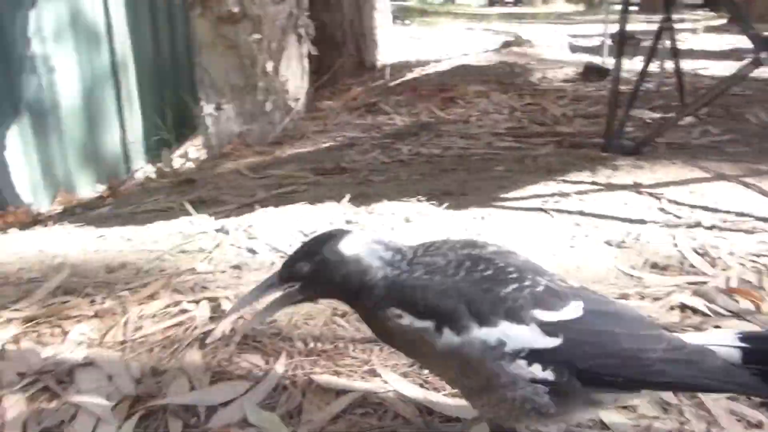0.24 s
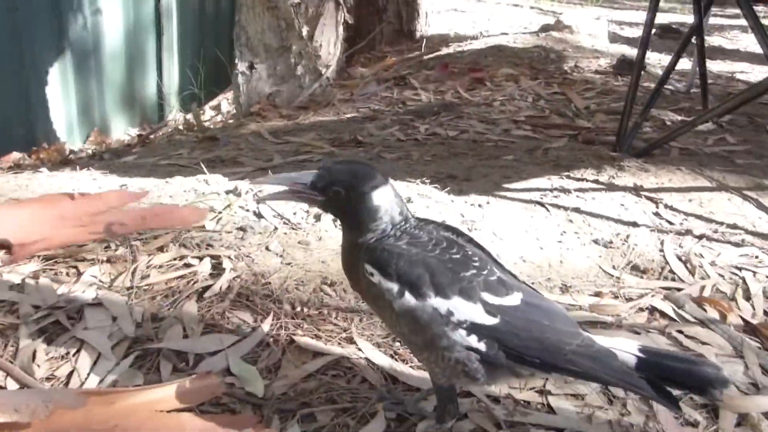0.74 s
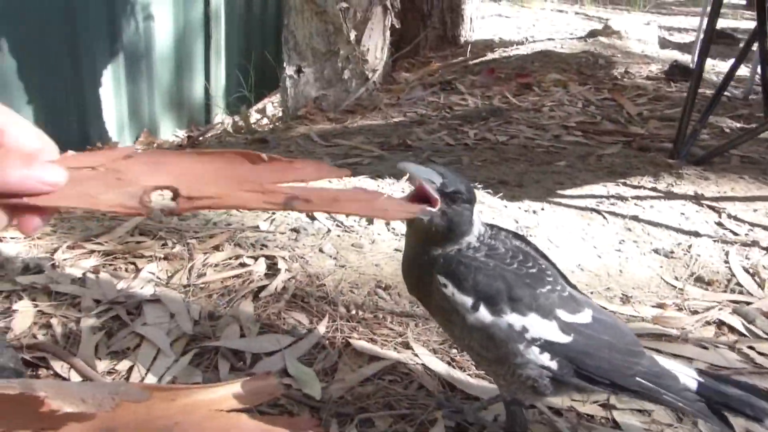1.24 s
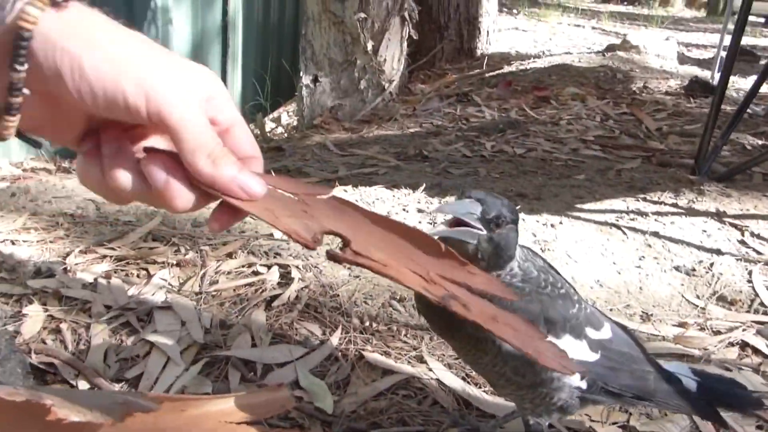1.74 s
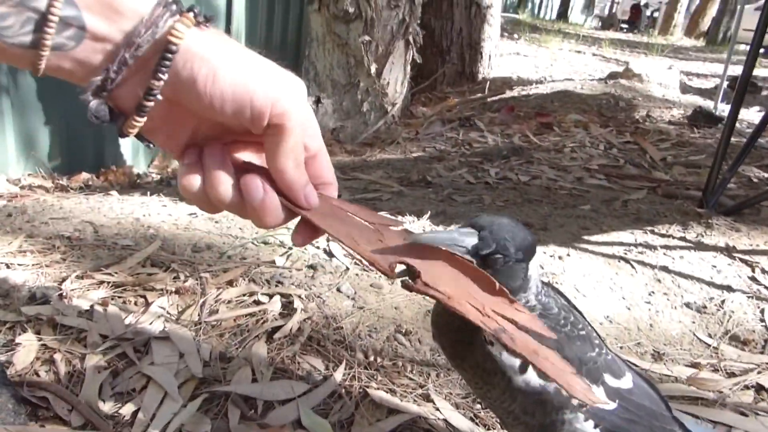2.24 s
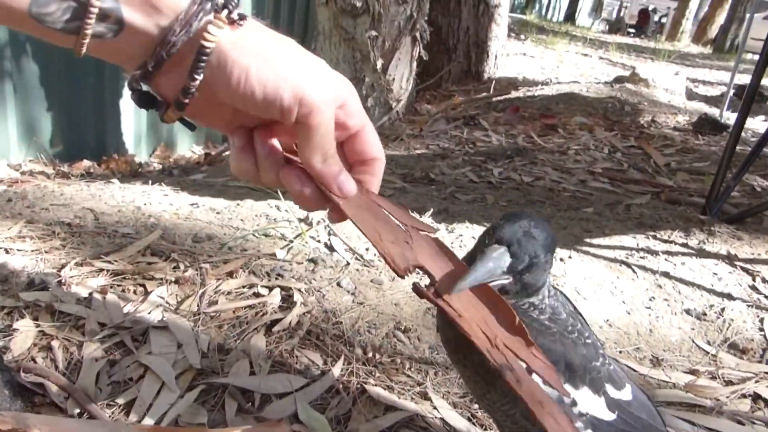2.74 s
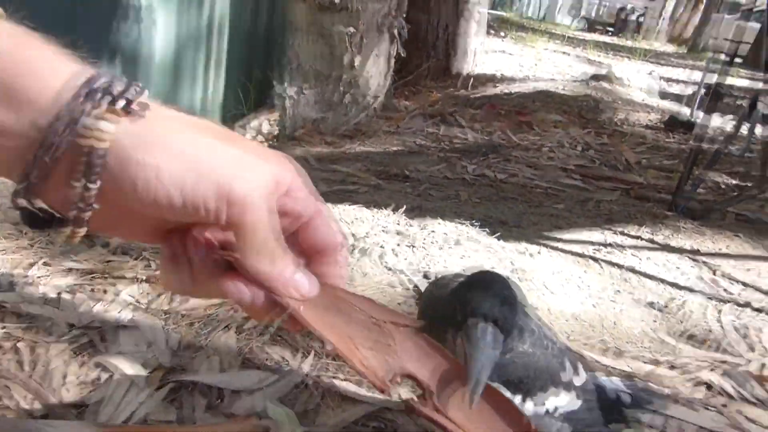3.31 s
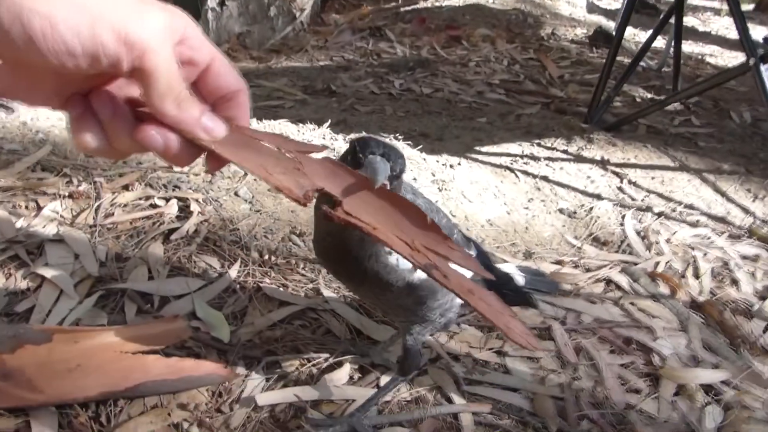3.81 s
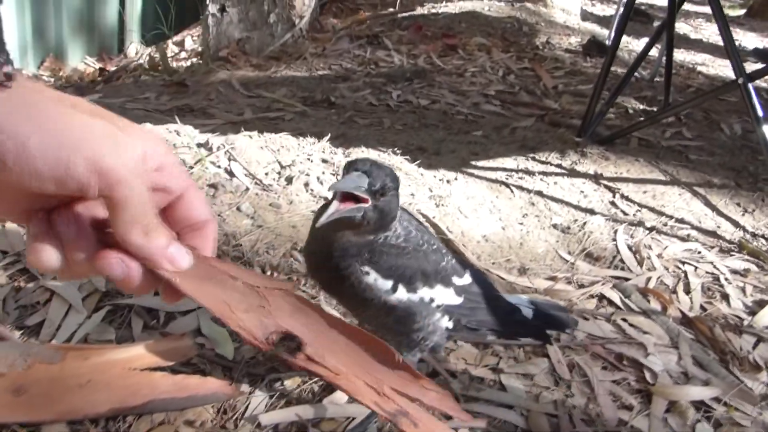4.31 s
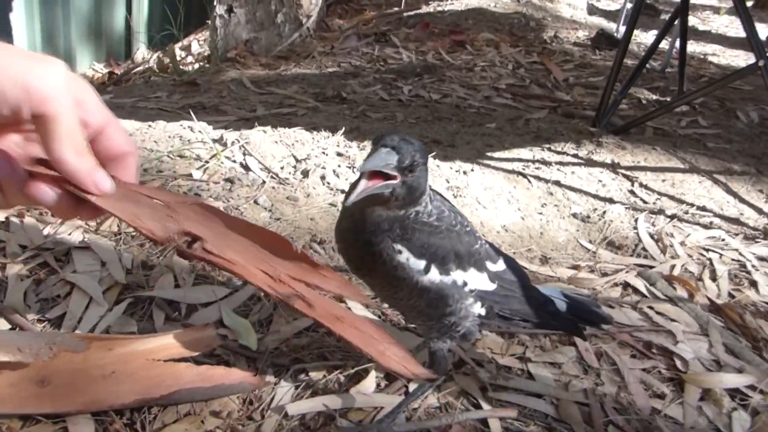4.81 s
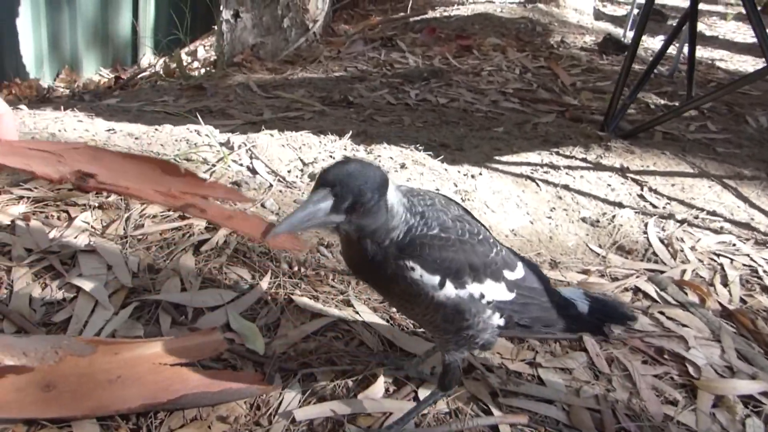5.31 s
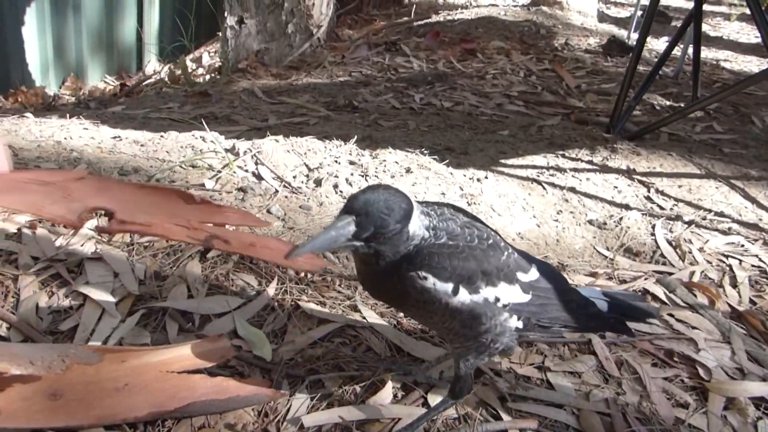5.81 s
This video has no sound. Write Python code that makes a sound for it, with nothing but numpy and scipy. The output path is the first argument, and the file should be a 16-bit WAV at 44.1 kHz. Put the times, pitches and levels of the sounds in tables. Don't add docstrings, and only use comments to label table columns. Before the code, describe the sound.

Dry, close outdoor sound with faint far-off hum and airy wash. Leaf rustle and twig snaps open, then a young magpie gives nasal, hoarse begging squawks, the first faint, the second long and loud, with clucks and crackle between. Beak knocks on bark lead into a rough, fibrous drag and rapid scuffs. Then come four arched calls, higher pitched and rising before they drop, among sparse clacks, leaf crackle and a final bead tick.

```python
import sys
import numpy as np
from scipy import signal
from scipy.io import wavfile
from scipy.ndimage import uniform_filter1d

SR = 44100
rng = np.random.default_rng(int(sys.argv[2]) if len(sys.argv) > 2 else 0)


def decibels_to_gain(level_db):
    exponent = np.asarray(level_db, float) / 20
    return 10 ** exponent


def int16_out(signal):
    q = np.round(np.clip(np.atleast_2d(signal).T, -1, 1) * 32767)
    wavfile.write(sys.argv[1], SR, q.astype(np.int16))


N = 266981

# start_scale, end_scale (of the resonances), low_growth_db_per_s
NECK = [
    (1.02, 0.99, -3),
    (1.032, 0.981, -0.2),
    (0.983, 1.01, 0.3),
    (.98, 1.017, 2),
    (1.007, 0.997, -5),
    (0.997, 1.01, 2.5),
    (1.002, 0.98, -6),
    (0.972, 1.022, 5),
]


def rms_one(x):
    return x / np.sqrt(np.mean(x ** 2) + 1e-20)


def in_time(rows):
    s, *columns = np.transpose(rows)
    return [np.interp(np.arange(N) / SR, s, column) for column in columns]


def sounding(tables, fade_s):
    t = np.arange(N) / SR
    return sum(np.clip(np.minimum(t - rows[0][0], rows[-1][0] - t) / fade_s + 1, 0, 1) for rows in tables).clip(0, 1)


def at_hz(points, hz):
    return np.interp(np.log(hz), np.log(np.array(points)[:, 0]), np.array(points)[:, 1])


def band(x, low_hz, high_hz, order=2):
    edges_hz = [low_hz, min(high_hz, SR / 2.2)]
    return signal.sosfilt(signal.butter(order, edges_hz, "band", fs=SR, output="sos"), x)


def drift(hz):
    r = np.exp(-2 * np.pi * hz / SR)
    noise = rng.standard_normal(N + 20000)
    return rms_one(signal.lfilter([1], [1, -2 * r, r * r], noise)[20000:])


def resonate(x, modes):
    out = 0
    for k, (hz, width, db) in enumerate(modes):
        r = np.exp(-np.pi * width / SR)
        poles = [1, -2 * r * np.cos(2 * np.pi * hz / SR), r * r]
        out = out + (-1) ** k * decibels_to_gain(db) * signal.lfilter([1 - r * r, 0, r * r - 1], poles, x)
    return out


def twice(x, modes):
    return rms_one(resonate(resonate(x, modes), modes))


def evened(x):
    return x / np.sqrt(uniform_filter1d(x ** 2, size=1500) + 1e-12)


def grains(per_s, spread_db, channels=2):
    sizes = decibels_to_gain(spread_db * np.minimum(rng.exponential(1, (channels, N)), 5))
    sizes = sizes * rng.choice([-1, 1], (channels, N))
    return sizes * (rng.random((channels, N)) < per_s / SR) + 1e-18


def paired(x, alike):
    alike = np.clip(alike, 0, 1)
    return (np.sqrt(1 + alike) * x[0] + np.sqrt(1 - alike) * x[1] * [[1], [-1]]) / np.sqrt(2)


def coloured(source, spectrum, patchy_db):
    # pitch_hz, likeness (0-1)
    likeness = [(100, 1), (240, 0.7), (950, 0.029), (3770, 0.71), (15000, 0.092)]
    out, edges_hz = 0, 42 * 2 ** np.arange(0, 9.1, .5)
    flicker = decibels_to_gain(patchy_db * drift(10.4))
    for k, (low, high) in enumerate(zip(edges_hz, edges_hz[1:])):
        hz = np.sqrt(low * high)
        gain = decibels_to_gain(at_hz(spectrum, hz)) * np.roll(flicker, 13000 * k)
        out = out + gain * paired(band(source[k % 2], low, high), at_hz(likeness, hz))
    return rms_one(out)


def open_air():
    # pitch_hz, density_db (per Hz)
    air_colour = [(18, -59), (30, 7), (53, -40), (90, 0), (161, -8), (193, -4.5), (264, -8), (301, -6),
                  (537, -15.5), (581, -6.5), (735, -7), (2100, -24), (7580, -29), (11000, -35),
                  (15800, -59)]
    # pitch_hz, width_hz, level_db
    hum = [(94, 3.5, -84), (186, 4.2, -57.5)]
    out = decibels_to_gain(-47.5) * coloured(rng.standard_normal((2, 2, N)), air_colour, patchy_db=2.5)
    noise = rng.standard_normal(N)
    for hz, width, db in hum:
        out = out + decibels_to_gain(db) * twice(noise, [(hz, width, 0)])
    return out


def leaves():
    # peak_s, peak_db, rise_db_per_s, fall_db_per_s
    shuffles = [(.08, -37, 4, 20), (.3, -44, 14, 75), (.845, -42.5, 700, 94), (1.05, -33.5, 130, 120),
                (1.66, -49.5, 200, 102), (1.93, -54, 54, 99), (2.78, -28.5, 194, 114),
                (3.87, -37.5, 115, 80), (4.02, -40, 56, 80), (4.3, -49, 1, 150), (4.75, -51, 56, 98),
                (5.26, -58.5, 60, 34), (5.96, -63, 60, 86)]
    # pitch_hz, density_db (per Hz)
    leaf_colour = [(530, -9), (900, 10), (1470, -7.5), (1820, 14), (2510, -9.5), (5310, 7), (6050, 0),
                   (10100, 4), (12500, -18), (15500, -35)]
    t = np.arange(N) / SR
    power = sum(decibels_to_gain(db - np.maximum(rise * (s - t), fall * (t - s))) ** 2 for s, db, rise, fall in shuffles)
    crackle = np.array([grains(7000 * decibels_to_gain(2.6 * drift(27)), 2.2) for k in range(2)])
    pan = decibels_to_gain(-4.5 + np.array([[1.5], [-1.5]]))
    return np.sqrt(power) * pan * coloured(crackle, leaf_colour, patchy_db=2.6)


def ticks():
    # start_s, peak_db, pitch_hz, left_right_db
    twig_snaps = [(.191, -24.5, 4030, 9), (0.224, -24, 5300, 11), (.277, -32, 5500, 9),
                  (0.295, -34, 5600, 6), (.086, -34.5, 6900, 6), (.5285, -32, 1540, 15),
                  (.598, -38, 6000, 8), (.68, -56, 8850, 2), (.762, -36, 1600, 1), (0.809, -36, 1825, 14),
                  (.833, -26, 5570, 5), (0.854, -27.5, 1950, 5), (0.891, -31, 1830, 3.5),
                  (0.89, -35, 8050, 3.5), (.9477, -29, 1660, 3), (0.973, -38, 3250, 4),
                  (.9951, -32, 3427, 2), (1.014, -37, 4030, 2.5), (4.749, -42, 4900, 10),
                  (4.774, -36, 1550, 3.5), (4.9233, -43, 4520, 11)]
    # start_s, peak_db, pitch_hz
    beak_clacks = [(2.609, -20.5, 1572), (2.705, -14, 1676), (2.718, -29, 4640), (2.738, -25, 1500),
                   (2.945, -23, 4000), (2.955, -31, 10500), (3.1638, -30, 3980), (3.3948, -26, 6860),
                   (3.8745, -25, 2040), (3.958, -25, 4670), (3.971, -23, 4800), (4.0211, -16, 4700),
                   (4.637, -25, 4600), (5.0209, -23, 4190)]
    # start_s, peak_db, pitch_hz
    high_pings = [(1.6878, -39, 8240), (1.735, -31, 8100), (1.7534, -45, 8250), (1.801, -37, 8250),
                  (1.869, -33, 8280), (2.717, -36, 8750), (2.845, -24, 9800), (2.869, -27, 9500),
                  (2.883, -40, 10900), (2.898, -34, 8200), (3.316, -26, 8250), (3.335, -44, 8250),
                  (3.3729, -23.5, 8160), (3.99, -33, 8800), (4.01, -33, 8800), (4.035, -34, 9000),
                  (6.0444, -21, 8100)]
    rows = [(*r, -5, 0.0011, 0.01, 9200) for r in twig_snaps]
    rows += [(*r, -1, 1.9, 0.00035, 0.0079, 6300) for r in beak_clacks]
    rows += [(*r, 3, -26, -0.3, -1.5, 11000) for r in high_pings]
    out, length = np.zeros((2, N)), 1300
    t = np.arange(length) / SR
    noises = rng.standard_normal((len(rows), 2, length))
    for (s, peak_db, hz, pan_db, snap_db, rise_s, ring_s, top_hz), noise in zip(rows, noises):
        burst = paired(noise, 0.89)
        decay = np.exp(-t / 0.00093) + 0.079 * np.exp(-t / 0.018)
        snap = band(burst * decay, 0.29 * hz, top_hz) * (1 - np.exp(-t / rise_s * 4))
        swell = (1 - np.exp(-t / rise_s)) * np.exp(-t / ring_s)
        ring = np.sqrt(hz / 5000) * resonate(burst * swell, [(hz, 700, -6)])
        tick = decibels_to_gain(snap_db) * snap + ring
        level = decibels_to_gain(peak_db + pan_db * np.array([[.5], [-.5]]))
        at = round(s * SR)
        out[:, at:at + length] += tick[:, :N - at] / np.abs(tick).max() * level
    return out


def squeak():
    # middle_s, pitch_hz, half_length_s, rise_per_s, level_db
    whistle = (2.684, 12300, 0.013, 1.4, -50)
    s, hz, half_s, rise, db = whistle
    t = np.arange(N) / SR - s
    return decibels_to_gain(db) * np.exp(-(t / half_s) ** 4) * np.sin(2 * np.pi * hz * t * (1 + rise * t / 2))


def bark_drag():
    # time_s, pressure_db, speed_db
    motion = [
        (2.76, -61, -53),
        (2.834, -47.5, -18.5),
        (2.962, -33.5, -23),
        (3.01, -42, -19.5),
        (3.136, -39, -36),
        (3.22, -44.5, -35.5),
        (3.334, -46.5, -28.5),
        (3.395, -39.5, -19.5),
        (3.45, -59, -51),
    ]
    # pitch_hz, width_hz, level_db
    strip_modes = [(187, 28.5, -4.5), (445, 121, 1.5), (537, 330, -0.5), (761, 86, 7.5)]
    # pitch_hz, width_hz, level_db
    grain_modes = [(3850, 760, 0)]
    # pitch_hz, width_hz, level_db
    fibre_modes = [(6770, 637, 14.5), (8450, 650, 15)]
    # pitch_hz, width_hz, level_db
    fine_modes = [(10600, 1200, -0.5)]
    body_db, coarse_db = in_time(motion)
    fine_db = -25 + 0.54 * coarse_db
    catches = paired(grains(2200 * decibels_to_gain(3.6 * drift(40)), 2.7), 1.0)
    body = rms_one(resonate(catches, strip_modes)) * decibels_to_gain([[2.0], [-2.0]])
    slips = paired(grains(8000 * decibels_to_gain(2.6 * drift(65)), 4.3), 0.92)
    drag = decibels_to_gain(body_db + 6) * body
    drag += decibels_to_gain(0.33 * body_db - 32.0) * twice(slips, grain_modes)
    drag += decibels_to_gain(coarse_db - 18.0) * twice(slips, fibre_modes)
    drag += decibels_to_gain(fine_db - 4.0) * twice(paired(grains(2500, 4.0), 0.56), fine_modes)
    return sounding([motion], 0.022) * drag


def bark_strokes():
    # start_s, peak_s, end_s, level_db, pitch_scale
    sweeps = [
        (3.415, 3.446, 3.484, -33, 0.99),
        (3.495, 3.506, 3.528, -39, .9),
        (3.519, 3.545, 3.568, -34.5, 1.04),
        (3.568, 3.614, 3.63, -36, 1.01),
        (3.684, 3.719, 3.752, -33.5, 0.973),
        (3.98, 4.01, 4.045, -40, 0.79),
    ]
    # pitch_hz, width_hz, level_db
    stroke_modes = [(420, 65, -3.5), (1213, 119, 5.5), (3060, 1200, -2.5), (6820, 650, 6.5),
                    (8050, 1700, -2), (11270, 4700, -13.5)]
    bite_s, shoulder = 0.011, 0.7
    t, out = np.arange(N) / SR, 0
    scuffs = paired(grains(9000 * decibels_to_gain(2.5 * drift(80)), 2.8), 0.94)
    for s, peak, end, db, scale in sweeps:
        bitten = s + bite_s
        swell = np.interp(t, [s, bitten, max(peak, bitten), end], [0, shoulder, 1, 0])
        out = out + decibels_to_gain(db + 7.5) * swell * rms_one(resonate(scuffs, np.multiply(stroke_modes, [scale, 1, 1])))
    return out


def clucks():
    # middle_s, pitch_hz, level_db, hoarseness (0-1)
    short_tones = [(0.072, 1770, -43.5, 0.3), (.088, 876, -37.5, 0.5), (.115, 577, -39.5, 0.26),
                   (.78, 876, -43, 0.43), (0.93, 600, -50, .3), (.965, 587, -42, 0.4),
                   (0.951, 1630, -55, .4), (.98, 1600, -50, 0.3), (0.989, 3280, -40, 1),
                   (1.015, 3340, -40.5, 1), (1.02, 4370, -37, 0.8), (1.075, 1625, -35.5, 1.1),
                   (1.112, 1710, -31, 1.1), (1.145, 1591, -36, 0.8), (3.915, 1067, -41, 1),
                   (3.95, 1220, -36.5, 0.6), (4.003, 1300, -38, 1.06)]
    now, flutter, out = np.arange(N) / SR, drift(210), 0
    for s, hz, db, hoarse in short_tones:
        t = now - s
        tone = np.sin(2 * np.pi * hz * t * (1 - 0.33 * t))
        out = out + decibels_to_gain(db) * np.exp(-(t / 0.022) ** 2) * (1 - hoarse + hoarse * flutter) * tone
    return out


def squawks():
    # time_s, pitch_hz, effort_db, gape_db (treble over fundamental)
    level_calls = [
        [(.401, 674, -41.5, 3), (.415, 732, -51.5, 19), (.499, 746, -47, -2.5), (.663, 805, -41, -6.5),
         (.683, 780, -43.5, -4)],
        [(1.052, 629, -32, 2), (1.106, 652, -32, -3.5), (1.206, 711, -35.5, 13.5), (1.32, 701.5, -29.5, 11),
         (1.375, 683, -32, 11), (1.46, 714, -28.5, 7.5), (1.53, 746.3, -27, 7), (1.612, 749.4, -28, 5),
         (1.644, 694, -35, 3)],
        [(1.948, 662.6, -44, 1), (1.994, 719, -41.5, 2), (2.1, 780, -38.5, -0.5), (2.298, 710, -33.5, 6.5),
         (2.378, 708.7, -27.5, 12.5), (2.51, 699.4, -30, 11.5), (2.56, 695.4, -38, 8)],
        [(2.757, 658, -38.5, 3.5), (2.86, 701, -37, 5), (2.934, 759, -40.5, 5), (3.024, 766.6, -38, -0.5),
         (3.114, 792.6, -51, 14), (3.135, 772, -42, -6)],
    ]
    # time_s, pitch_hz, effort_db, gape_db (treble over fundamental)
    arched_calls = [
        [(3.428, 778, -43.5, -15), (3.496, 814.6, -36, -4), (3.54, 853, -34, 0), (3.668, 915.5, -36, -9.5),
         (3.7, 937, -35.5, -8.5), (3.76, 938, -36, -11.5), (3.8, 939, -29, -2), (3.852, 916, -34, -6.5)],
        [(4.354, 746, -37, 1), (4.501, 918, -35.5, -1), (4.599, 929, -35, -0.5), (4.64, 921, -39, -4),
         (4.665, 912, -39, -9)],
        [(4.973, 736.6, -34.5, 4.5), (5.0, 756, -36.5, 3.5), (5.03, 810, -36.5, 1), (5.05, 877, -34.5, 1.5),
         (5.107, 897, -33, 2), (5.135, 961, -33.5, -0.5), (5.195, 978, -33.5, 1.5), (5.239, 943, -40.5, -8)],
        [(5.412, 709, -36, 6), (5.47, 703.6, -33.5, 5.5), (5.55, 810, -34, 0), (5.64, 875.4, -30.5, -1),
         (5.72, 861.5, -30, 2), (5.774, 908, -30.5, -1), (5.895, 876, -31.5, 1.5), (5.92, 835, -44, 2),
         (5.943, 640, -48.5, -1)],
    ]
    # onset_softness_db, release_s, low_overtones_db, strong_weak_alternation_rad, left_right_db
    manner = [
        (14, .047, 1.5, 0.0082, -2.5),
        (12, .026, -2.5, 0.22, -0.5),
        (3, .03, 0, 0.1, -1.5),
        (15, .012, 1.5, 0.019, -2.5),
        (-8, .048, -1, 0.0552, -1),
        (1, 0.032, -3, 0.16, 0.5),
        (3.5, 0.019, -7, 0.1, -1),
        (0.5, 0.026, -0.5, 0.2, 0.4),
    ]
    attack_s, scoop_hz, late_fundamental_db = .016, 29.97, 6.5
    sag_hz_per_s, release_db, closing_db = 2200, 25.5, 13
    follows_gape, low_bark_db, low_bark_s = 0.35, 2.5, 0.041
    out = []
    for rows, (soft_db, release_s, low_db, alternation, pan_db), (*_, grow_db) in zip(
            level_calls + arched_calls, manner, NECK):
        (s, hz, db, gape), end = rows[0], rows[-1]
        onset = (s - attack_s, hz - scoop_hz, db - (late_fundamental_db + soft_db) / 2,
                 gape + late_fundamental_db - soft_db)
        release = np.add(end, [release_s, -sag_hz_per_s * release_s, -release_db, -closing_db])
        call = []
        for s, hz, db, gape in [onset, *rows, release]:
            low = db + low_db + grow_db * (s - end[0]) + follows_gape * gape
            low += low_bark_db * np.exp((onset[0] - s) / low_bark_s)
            call.append((s, hz, db - gape / 2, low, db + gape / 2, alternation, pan_db))
        out.append(call)
    return out


def rasp():
    # from_s, turbulent_share (0-1)
    membrane_states = [(0, .85), (.44, .12), (.62, .3), (.9, .87), (1.162, .25), (1.37, .35), (1.49, .008),
                       (1.615, .4), (1.8, .86), (2.13, .7), (2.23, .4), (2.345, .004), (2.535, .4),
                       (2.65, .45), (2.875, 1), (3.3, .75), (3.52, .58), (3.62, .27), (3.69, .42),
                       (3.76, .33), (4.1, .56), (4.43, .38), (4.582, .07), (4.8, .56), (5.12, .44),
                       (5.3, .48), (5.49, .42), (5.83, .5), (5.92, .25)]
    s, share = np.transpose(membrane_states)
    share = share[np.searchsorted(s, np.arange(N) / SR, side="right") - 1]
    share = uniform_filter1d(share, size=1300)
    return share, .011 + .62 * np.abs(share) ** 1.75


def clean_cycles(shaken, pitch):
    waver, pulses = decibels_to_gain(2.84 * drift(11.3)), 0
    for k in range(1, 22):
        overtone = np.cos(k * shaken + 0.352 * k * k) / k ** 0.14
        pulses = pulses + overtone * (k * pitch < SR / 2.6) * np.roll(waver, 9000 * k)
    return rms_one(pulses)


def chaotic_cycles(phase, shaken, turbulent, air):
    flicker, strands = drift(40), 0
    half_shaken = phase + 0.62 * (shaken - phase)
    for k in range(3, 24):
        strands = strands + np.roll(flicker, 6000 * k) * np.cos(k * half_shaken / 2 + k * k)
    sizes = decibels_to_gain((3 + 6 * turbulent) * rng.uniform(-1.7, 1.7, N)) - 0.7
    cycle_ends = np.diff(np.maximum.accumulate(shaken // (2 * np.pi)), prepend=0) > 0
    slaps = evened(-sizes * cycle_ends + 1e-6 * air)
    slaps = rms_one(signal.lfilter([1, -0.2], [1], slaps))
    chaos = .3 * air + .62 * rms_one(strands) + .85 * slaps
    return chaos * turbulent + band(chaos, 1500, 22000, order=1) * (1 - turbulent)


def windpipe(source, calls, air):
    # pitch_hz, width_hz, level_db
    level_modes = [
        [(1315, 110, 20), (2230, 750, 11.5), (4600, 730, 16), (8500, 690, 1)],
        [(1280, 186, 9.5), (2250, 360, 7.5), (3240, 164, 1.5), (4093, 150, 13), (5560, 660, 3.5),
         (6350, 99, 9.5), (7760, 1100, -4.5), (9877, 580, 1)],
        [(1300, 171, 6.5), (2130, 232, 2), (3004, 190, -0.5), (4040, 255, 7), (4670, 520, 5.5),
         (5600, 230, 10.5), (6320, 99, 5.5), (7050, 146, 6.5), (7710, 91, 4), (8320, 230, 4.5),
         (10100, 310, -5), (12100, 2000, -4.5)],
        [(1300, 124, -3), (2080, 352, -7.5), (4190, 290, 5.5), (5420, 480, 11.5), (6860, 1000, -0.5),
         (10600, 2300, -2)],
    ]
    # pitch_hz, width_hz, level_db
    arched_modes = [
        [(1800, 584, 9), (3520, 240, 7.5), (5570, 340, 2), (6730, 280, 5.5), (8250, 2700, -7.5)],
        [(1700, 740, -8.5), (2990, 110, 0.5), (4600, 354, 4.5), (5720, 570, 3), (6770, 860, -4), (9000, 460, 1)],
        [(1357, 700, -4.5), (3120, 356, -2), (4360, 420, 3.5), (5680, 970, 4.5), (7000, 460, -1),
         (8740, 760, 2)],
        [(1359, 202, 13.5), (2640, 186, 13), (4030, 330, 2), (5110, 302, 5), (5903, 230, -3), (7113, 630, 1),
         (8285, 240, -2.5), (9186, 740, 0.5)],
    ]
    # pitch_hz, width_hz, depth (0-1)
    pocket = [
        (3500, 600, 0.7),
        (1730, 230, 0.66),
        (4910, 250, 0.65),
        (3100, 500, 0),
        (2480, 360, 0.7),
        (2330, 455, 0),
        (2314, 400, 0.12),
        (1732, 164, 0.4),
    ]
    pipe = 1e-4 * air
    for rows, modes, (hz, width, depth), (early, late, _) in zip(calls, level_modes + arched_modes, pocket, NECK):
        span = slice(round(rows[0][0] * SR) - 500, round(rows[-1][0] * SR) + 500)
        along, rung = np.linspace(0, 4, span.stop - span.start), 0
        for k, scale in enumerate(np.linspace(early, late, 5)):
            share = np.clip(1 - np.abs(along - k), 0, 1)
            rung = rung + share * resonate(source[span], np.multiply(modes, [scale, 1, 1]))
        pipe[span] = rung + 0.65 * band(source[span], 2500, 25000, order=1)
        pipe[span] -= np.clip(depth, 0, 1) / 2 * resonate(pipe[span], [(hz, width, 0)])
    return pipe


def magpie():
    # pitch_hz, width_hz, level_db
    throat_modes = [(810, 124, 0)]
    # start_s, end_s, level_db
    octave_spans = [
        (1.046, 1.193, -36),
        (2.26, 2.54, -36.5),
        (2.745, 2.87, -37.5),
        (3.514, 3.869, -41.5),
        (4.34, 4.356, -36.5),
        (5.401, 5.491, -43),
    ]
    calls = squawks()
    pitch, first_db, low_db, high_db, alternation, pan_db = in_time(np.vstack(calls))
    turbulent, jitter = rasp()
    alternation = alternation * np.minimum(turbulent / 0.56, 1)
    unsteady = (0.00404 + 0.0505 * np.minimum(jitter, .2)) * drift(28.44)
    phase = 2 * np.pi * np.cumsum(pitch * (1 + unsteady)) / SR
    tremble = jitter * drift(286)
    shaken = phase + tremble + alternation * (1 + 0.29 * drift(26)) * np.sin(phase / 2)
    air = rng.standard_normal(N) * (1 + 2.0 * np.cos(shaken)) * decibels_to_gain(1.0 * drift(105))
    source = (1 - turbulent) * clean_cycles(shaken, pitch)
    source = source + turbulent * chaotic_cycles(phase, shaken, turbulent, air)
    pipe = windpipe(source, calls, air)
    first = np.sqrt(2) * np.cos(phase + 0.64 * tremble) * (1 + .5 * jitter * drift(145))
    first *= 1 - 2.35 * turbulent ** 10.0
    first += 1.5 * turbulent ** 3.9 * twice(air, throat_modes)
    low = evened(band(pipe, 940, 3170, order=4))
    high = evened(band(pipe, 2760, 11150, order=3))
    breast = decibels_to_gain(first_db - 0.3 * np.array([[.5], [-.5]])) * first
    voice = sounding(calls, 0.0018) * (breast + decibels_to_gain(low_db) * low)
    octave = sum(decibels_to_gain(db) * sounding([[[s], [end]]], 0.0066) for s, end, db in octave_spans)
    voice = voice + octave * np.sqrt(2) * np.cos(2 * phase + tremble)
    beamed = np.array([high + 0.24 * np.roll(high, 11), high - 0.18 * np.roll(high, 11)]) * decibels_to_gain([[.5], [-.5]])
    voice = voice + sounding(calls, 0.0005) * decibels_to_gain(high_db) * beamed
    return voice * decibels_to_gain(pan_db * [[.5], [-.5]])


def scene():
    # delay_s, level_db
    reflections = [(.0021, -20), (.0047, -50), (.013, -20.5), (.031, -18.5)]
    near = magpie() + clucks() + squeak() + ticks() + bark_drag() + bark_strokes()
    dull = band(near, 110, 12000, order=1)
    out = near + leaves() + open_air()
    for k, (s, db) in enumerate(reflections):
        for side in range(2):
            lag = round(s * SR * (1 + .25 * ((k + side) % 2)))
            out[side, lag:] += decibels_to_gain(db) * dull[side, :-lag]
    return out


def top_cut(x):
    return signal.sosfilt(signal.butter(12, 16480, fs=SR, output="sos"), x)


def record(dry):
    low_hz, high_hz, self_noise_db, self_noise_top_hz = 89.6, 15200, -78, 55
    heard = signal.sosfilt(signal.butter(4, low_hz, "high", fs=SR, output="sos"), dry)
    heard = heard + decibels_to_gain(self_noise_db) * rms_one(band(rng.standard_normal((2, N)), 18, self_noise_top_hz))
    heard = signal.sosfilt(signal.butter(8, high_hz, "low", fs=SR, output="sos"), heard)
    return top_cut(heard)


dry = scene()
out = record(dry)
int16_out(out)
```